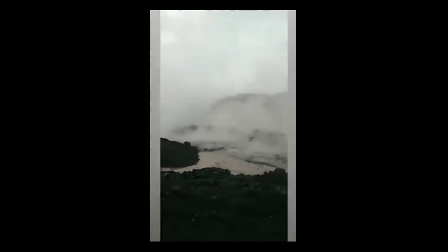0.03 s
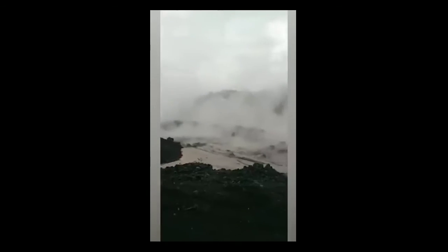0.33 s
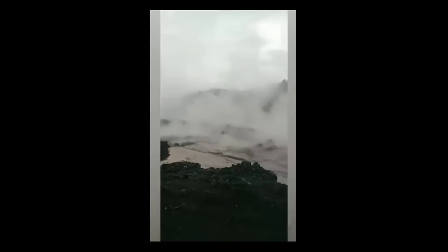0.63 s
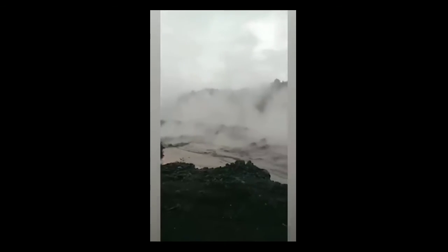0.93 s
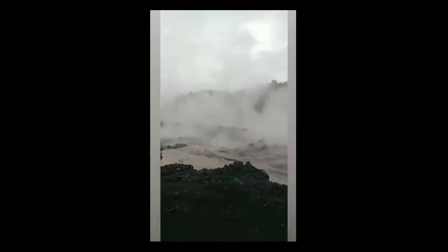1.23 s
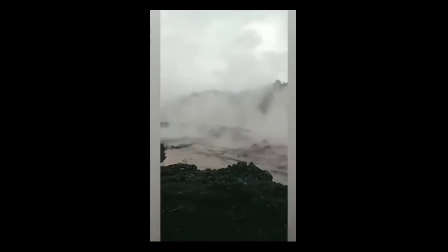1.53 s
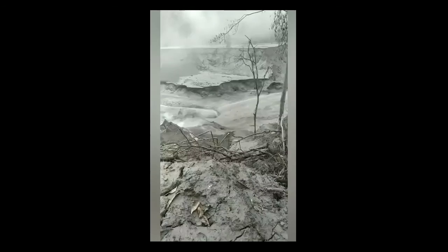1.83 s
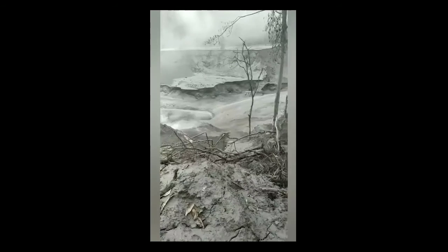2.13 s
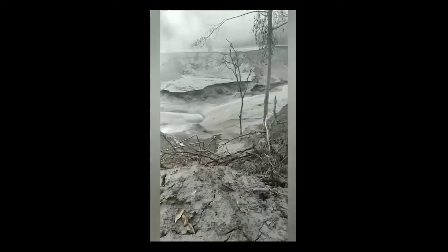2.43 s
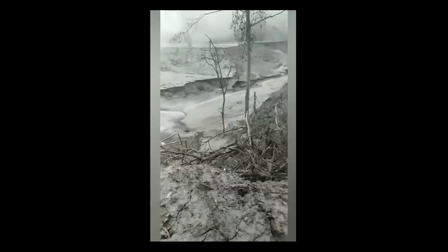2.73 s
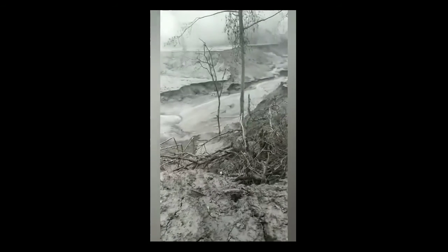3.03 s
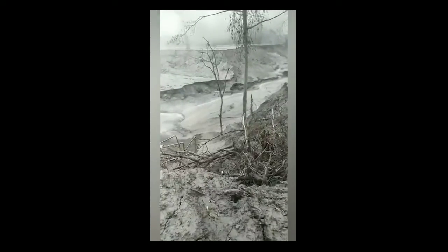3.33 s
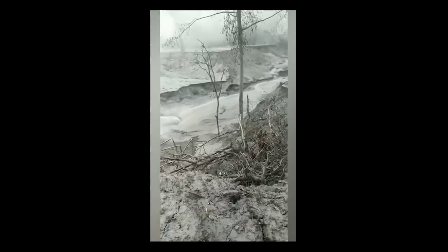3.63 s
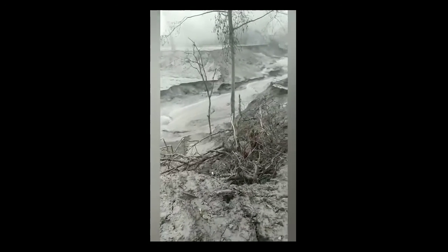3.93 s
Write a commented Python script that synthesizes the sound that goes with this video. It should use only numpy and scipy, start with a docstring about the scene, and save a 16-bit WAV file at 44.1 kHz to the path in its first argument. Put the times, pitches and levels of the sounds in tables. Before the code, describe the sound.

Floodwater rushes through a valley close to the microphone, splashing, surging and thumping. It cuts to brief silence, then returns in stereo from the bank as a low rumble and hollow roar with dull stone knocks, fading at the end.

```python
"""A muddy flood roars down a valley channel, close up and in mono: rapids hiss and splash off the
rocks, and the heavy water churns in surges and now and then thumps. After a short silence it is
heard muffled from a bank, on a stereo pair of microphones: a low rumble and a hollow roar with
wandering resonances and dull knocks, as of rolling stones. Near the end the flood sinks away."""
import sys
import numpy as np
from scipy import signal
from scipy.fft import rfft, irfft
from scipy.io import wavfile

SR = 44100
rng = np.random.default_rng(int(sys.argv[2]) if len(sys.argv) > 2 else 0)


def wrap_up_sound(samples):
    """Save the sound to the file named by the first command line argument, as 16-bit audio."""
    columns = np.atleast_2d(samples).T
    # keep every value between -1 and 1, then stretch to whole-number steps
    tamed = np.clip(columns, -1, 1)
    steps = np.round(tamed * 32767).astype(np.int16)
    wavfile.write(sys.argv[1], SR, steps)


N = 176400
TIME, FREQ = np.arange(N) / SR, np.maximum(np.arange(N // 2 + 1) * SR / N, 1)

# The rapids from close by. Each row: frequency in Hz, relative level in dB.
RAPIDS_SPECTRUM = [(260, -31), (450, -7.5), (529, -2), (888, 0.5), (1050, -3.5), (1190, -4), (2060, 0),
                   (2360, -2.5), (3890, -18), (5010, -16), (7250, -11), (8910, -19.5), (9740, -20.5),
                   (11300, -33), (15400, -42.5)]
# The churning water from close by. Each row: frequency in Hz, relative level in dB.
CHURN_SPECTRUM = [(20, -25.5), (44, -23), (62, -8), (90, -1.5), (125, 0), (200, 0), (245, -2.5), (295, 1.4),
                  (370, -2), (440, -6.5), (480, -11.5)]


def from_db(db):
    """Decibels to gain."""
    return 10 ** (np.asarray(db) / 20)


def rms_one(x):
    """Scale to unit rms."""
    return x / np.sqrt(np.mean(x ** 2) + 1e-20)


def fader(levels):
    """Gain over time through (seconds, dB) points."""
    return from_db(np.interp(TIME, *np.transpose(levels)))


def over_hz(points):
    """Join (Hz, value) points on a log-frequency axis."""
    hz, value = np.transpose(points)
    return np.interp(np.log(FREQ), np.log(hz), value)


def colour(spectrum):
    """Gain per frequency through (Hz, dB) points, falling steeply beyond the ends."""
    octaves_outside = np.abs(np.log2(FREQ / np.clip(FREQ, spectrum[0][0], spectrum[-1][0])))
    return from_db(over_hz(spectrum) - 100 * octaves_outside)


def resonance(hz, half_width_hz):
    """Gain per frequency of a peak that is 12 dB down at half_width_hz to either side."""
    return 1 / (1 + ((FREQ - hz) / half_width_hz) ** 2) ** 2


def noise(gain):
    """Steady noise of a given colour, unit rms."""
    return rms_one(irfft(rfft(rng.standard_normal(N)) * gain, N))


def drift(rate_hz):
    """A random wander of unit rms, mostly slower than rate_hz."""
    return noise(1 / (1 + (FREQ / rate_hz) ** 2))


def turbulence(spectrum, surge_db, flicker_db, rate_hz, channels=1):
    """Noise whose half-octave bands surge together and flicker on their own."""
    coloured = rfft(rng.standard_normal((channels, N))) * colour(spectrum)
    band = np.floor(2 * np.log2(FREQ / 20))
    surge, out = surge_db * drift(rate_hz), 0
    for k in range(20):
        out = out + irfft(coloured * (band == k), N) * from_db(surge + flicker_db * drift(rate_hz))
    return rms_one(out)


def bump(s, sigma_s):
    """A bell-shaped rise and fall around second s."""
    return np.exp(-.5 * ((TIME - s) / sigma_s) ** 2)


def rapids():
    """Fast, turbulent water hisses close to the microphone."""
    return from_db(-22.86) * turbulence(RAPIDS_SPECTRUM, surge_db=.63, flicker_db=.42, rate_hz=11)


def splashes(per_s=1500, spread_db=7.5):
    """Countless small splashes crackle in the rapids."""
    born = rng.random(N) < per_s / SR
    sizes = from_db(spread_db * np.minimum(rng.exponential(1, N), 4))
    clicks = born * sizes * rng.choice([-1, 1], N)
    return from_db(-32) * rms_one(irfft(rfft(clicks) * colour(RAPIDS_SPECTRUM), N))


def off_rocks(water, count=24):
    """Faint, short reflections off the nearby rocks ripple the colour of the water."""
    delays_s = np.geomspace(.002, .025, count) * rng.uniform(.92, 1.05, count)
    echoes = sum(rng.choice([-1, 1]) * np.roll(water, int(s * SR)) for s in delays_s)
    return water + from_db(-14.5) * echoes / np.sqrt(count)


def churn():
    """Heavy, muddy water churns low beneath the rapids."""
    return from_db(-24.5) * turbulence(CHURN_SPECTRUM, surge_db=.87, flicker_db=1.23, rate_hz=9.4)


def thumps():
    """Masses of water land with short, deep booms."""
    # Each row: centre in seconds, level in dB.
    landings = [(.2, -22), (.31, -33), (.655, -27.5), (.765, -36.5), (1.646, -28.5), (1.71, -26)]
    band = colour([(55, 0), (110.5, 0)])
    even_boom = np.cos(np.angle(signal.hilbert(noise(band))))   # phase alone, so the level holds
    boom = rms_one(irfft(rfft(even_boom) * band, N))
    return boom * sum(from_db(db) * bump(s, .017) for s, db in landings)


def surges(top_hz=240):
    """The churning water heaves in short, deep surges."""
    # Each row: centre in seconds, level in dB.
    heaves = [(.31, -25), (.55, -29.5), (0.649, -28), (0.729, -23.5), (.83, -24.5), (1.1, -22.5),
              (1.38, -24), (1.73, -23), (1.83, -26.5)]
    body = noise(colour(CHURN_SPECTRUM) / np.sqrt(1 + (FREQ / top_hz) ** 4))
    return body * sum(from_db(db) * bump(s, .03) for s, db in heaves)


def breakers():
    """Small waves break in the rapids with brief swishes."""
    # Each row: centre in seconds, pitch in Hz, level in dB.
    waves = [(.55, 735, -32.5), (.69, 2220, -25), (1.0, 7280, -33), (1.12, 962, -36), (1.375, 2000, -27.5),
             (1.43, 9500, -57)]
    return sum(from_db(db) * bump(s, .018) * noise(resonance(hz, .2 * hz)) for s, hz, db in waves)


def near_flood():
    """The channel close up, in mono: hissing rapids over churning water."""
    # The flow eases slightly. Each row: time in seconds, gain in dB.
    easing = [(0, 1.33), (.3, 0.83), (.8, 0.63), (1.2, 0.4), (1.5, 0.05), (1.88, -0.53)]
    flow = off_rocks(rapids() + splashes()) + churn()
    return flow * fader(easing) + thumps() + surges() + breakers()


def microphone_pair(mid_and_side):
    """Spread two signals over the microphones on the bank; the left one hears the flood first."""
    # How alike the two sides are. Each row: frequency in Hz, coherence from 0 to 1.
    coherence = [(60, .975), (300, .972), (650, .935), (950, .82), (2000, .72), (3000, .55), (4500, .2)]
    # Each row: frequency in Hz, phase lead of the left side in radians.
    left_lead = [(60, .08), (320, .1), (500, .38), (680, .7), (850, .95), (1150, .95), (1450, .6),
                 (1750, 1.8), (2100, 1.2), (3000, 2.2)]
    # Each row: frequency in Hz, left minus right level in dB.
    balance = [(100, -2), (260, 0), (400, -3), (650, -3), (1150, 3), (1550, -2), (1900, 2.5)]
    mid, side = rfft(mid_and_side)
    alike, sign = over_hz(coherence), np.array([[1], [-1]])
    both = (np.sqrt(1 + alike) * mid + sign * np.sqrt(1 - alike) * side) / np.sqrt(2)
    gain = from_db(sign * over_hz(balance) / 2)
    return irfft(both * gain * np.exp(.5j * sign * over_hz(left_lead)), N)


def rumble():
    """The low rumble of the flood, heard from the bank."""
    # Each row: frequency in Hz, relative level in dB.
    spectrum = [(12, -63), (20, -37.5), (40, -25), (113, 1), (398, -8), (430, -10.5), (560, -35),
                (950, -120)]
    # Each row: time in seconds, level in dB.
    levels = [(2.2, -37.5), (2.29, -28.5), (2.6, -27.5), (3.0, -28.5), (3.27, -29), (3.45, -26.5),
              (3.61, -30.5), (3.68, -31.5), (3.82, -41), (4, -38)]
    water = turbulence(spectrum, surge_db=.5, flicker_db=.7, rate_hz=14, channels=2)
    return microphone_pair(water) * fader(levels)


def roar():
    """The muffled roar above the rumble; its bands flicker fast enough to rattle."""
    # Each row: frequency in Hz, relative level in dB.
    spectrum = [(420, -4.5), (480, -4.5), (560, -2.5), (680, -2.5), (800, -6.5), (950, -15), (1200, -22),
                (1450, -29), (1600, -35), (1760, -47.5), (1950, -54), (2500, -66)]
    # Each row: time in seconds, relative level in dB.
    levels = [(2.2, -38.5), (2.25, -28.5), (2.32, -25.5), (2.6, -25), (3.0, -26), (3.57, -25.5),
              (3.65, -33), (3.74, -41.5), (4, -40.5)]
    water = turbulence(spectrum, surge_db=.44, flicker_db=1.1, rate_hz=62, channels=2)
    return from_db(-1.57) * microphone_pair(water) * fader(levels)


def hollows(wander_hz=7):
    """Hollow resonances wander in pitch and linger briefly as the roar sinks."""
    # Each row: pitch in Hz, half-width in Hz, relative level in dB.
    peaks = [(535.2, 7.3, -8), (607, 20, -6), (664.3, 28, -2.5), (708, 26, -5.5)]
    # Each row: time in seconds, gain for all the peaks in dB.
    levels = [(2.2, -39), (2.28, -30.5), (2.6, -29), (3.0, -31), (3.55, -28), (3.66, -28), (3.73, -35.5),
              (3.8, -42.5), (4, -51)]
    out = 0
    for hz, half_width_hz, db in peaks:
        wander = np.exp(2j * np.pi * np.cumsum(wander_hz * drift(rate_hz=3.015)) / SR)
        ring = signal.hilbert([noise(resonance(hz, half_width_hz)) for _ in range(2)])
        evened = np.real(ring * wander) / np.sqrt(np.abs(ring) + 1e-9)
        out = out + from_db(db) * rms_one(evened)
    return microphone_pair(out) * fader(levels)


def wash():
    """A steady, faint wash of distant water."""
    # Each row: frequency in Hz, relative level in dB.
    spectrum = [(1000, -0.5), (1450, -5), (1750, -15), (2000, -14.5), (2450, -26), (2800, -24), (3500, -33),
                (4500, -39), (12500, -49)]
    return from_db(-62) * microphone_pair([noise(colour(spectrum)) for _ in range(2)])


def hiss():
    """A very faint, uneven hiss with one tiny tick; it swells as the roar sinks."""
    # Each row: frequency in Hz, relative level in dB.
    spectrum = [(2500, 3.5), (3300, -3), (6200, -6), (11900, -5), (14000, -18)]
    # Each row: time in seconds, level in dB.
    levels = [(2.2, -100), (2.6, -96.5), (3.6, -91), (3.9, -82.5), (4, -80)]
    uneven = turbulence(spectrum, surge_db=1.5, flicker_db=.2, rate_hz=14, channels=2)
    tick = from_db(-75) * bump(2.966, .0013) * noise(colour(spectrum))
    return uneven * fader(levels) + tick


def knocks(pitch_hz=650, t60_s=.028, band_hz=(180, 1200)):
    """Stones collide under water: a few damped cycles each."""
    # Each row: start in seconds, relative level in dB.
    collisions = [(2.443, -13.5), (2.697, -17), (2.802, -17.5), (3.118, -13), (3.239, -16), (3.28, -19),
                  (3.35, -23.5), (3.436, -15.5), (3.531, -22), (3.594, -12.5), (3.642, -20), (3.872, -26.5)]
    out = 0
    for s, db in collisions:
        age = np.maximum(TIME - s, 0)
        hz = pitch_hz * rng.uniform(.9, 1.1)
        out = out + from_db(db - 60 * age / t60_s) * np.sin(2 * np.pi * hz * age)
    dull = signal.sosfilt(signal.butter(6, band_hz, "band", fs=SR, output="sos"), out)
    return microphone_pair([dull, np.zeros(N)])


def whistles():
    """Narrow bands of noise whistle faintly in the roar, dead centre."""
    # Each row: centre in seconds, pitch in Hz, level in dB.
    notes = [(2.46, 2220, -72.5), (2.6, 1910, -65.5), (3.36, 1900, -74.5), (3.5, 1990, -70.5),
             (3.59, 1590, -61), (3.7, 1360, -59.5)]
    return sum(from_db(db) * bump(s, .055) * noise(resonance(hz, 140)) for s, hz, db in notes)


def scene(near_end_s=1.888, bank_start_s=2.2, fade_s=.003):
    """The flood close up, a short silence, then the muffled flood from the bank."""
    near = near_flood() * (TIME < near_end_s)
    bank = rumble() + roar() + hollows() + wash() + hiss() + knocks() + whistles()
    bank_fade = np.clip(np.minimum(TIME - bank_start_s, TIME[-1] - TIME) / fade_s, 0, 1)
    return near + bank * bank_fade


def record(dry, cutoff_hz=15600):
    """A steep low-pass takes off the highest treble."""
    return signal.sosfilt(signal.ellip(12, .1, 80, cutoff_hz, fs=SR, output="sos"), dry)


dry = scene()
out = record(dry)
wrap_up_sound(out)
```